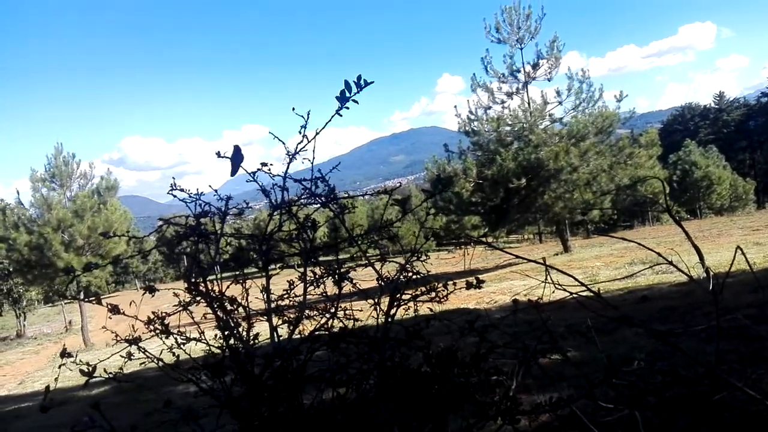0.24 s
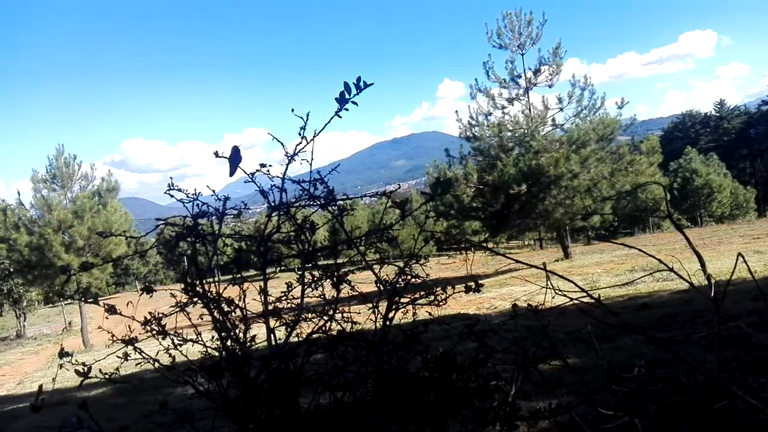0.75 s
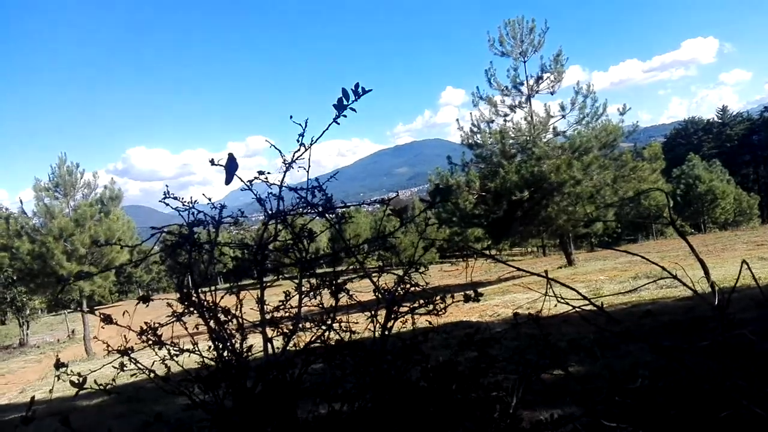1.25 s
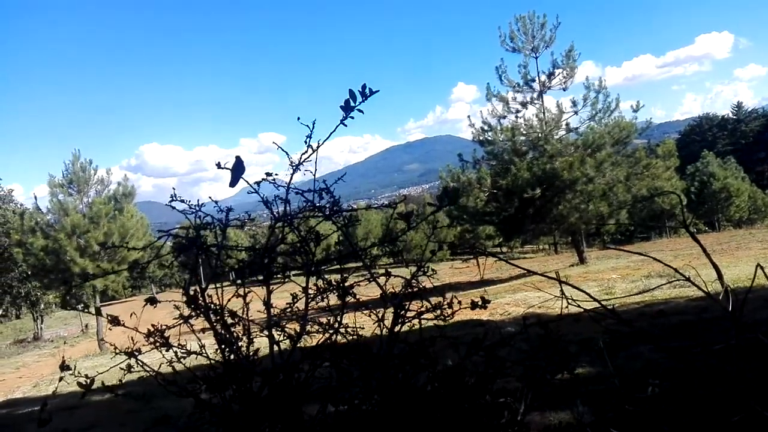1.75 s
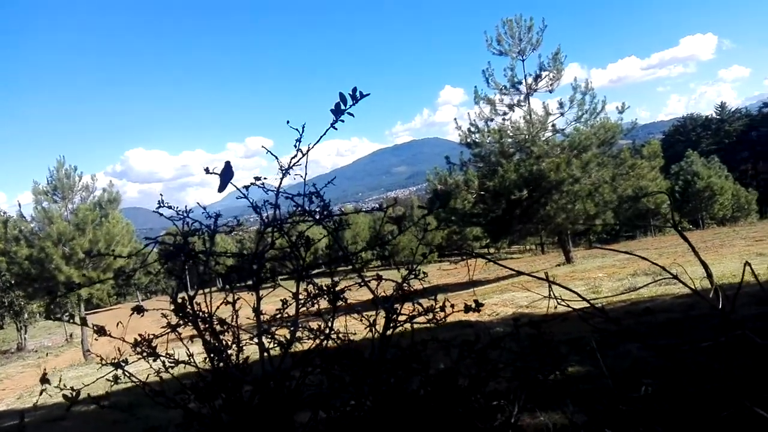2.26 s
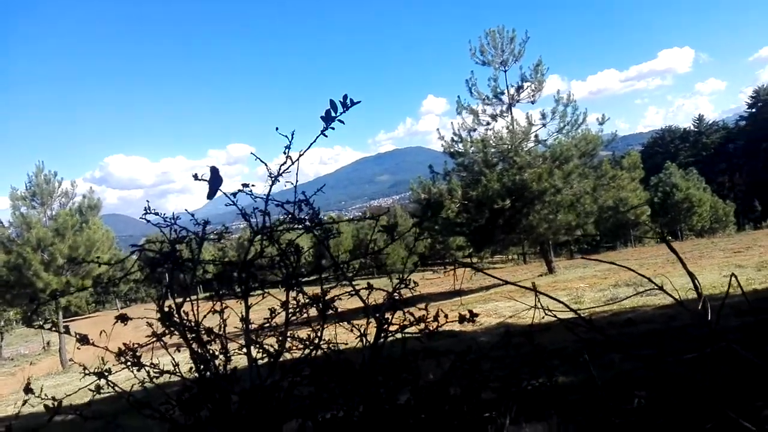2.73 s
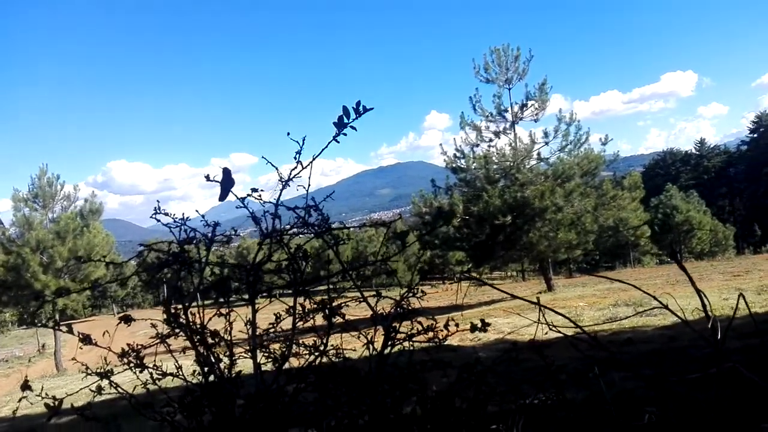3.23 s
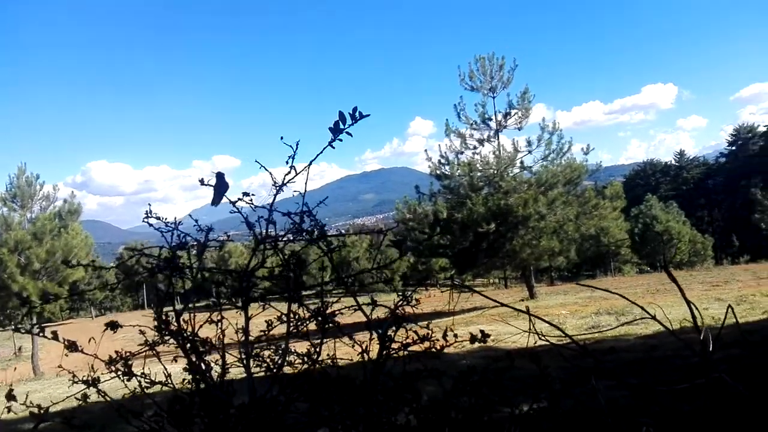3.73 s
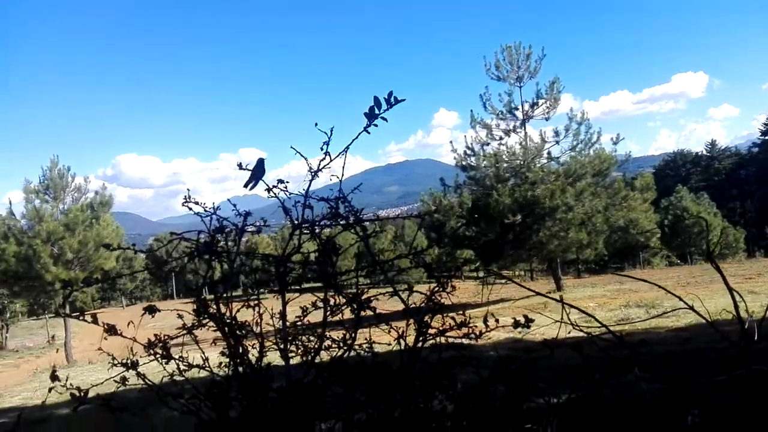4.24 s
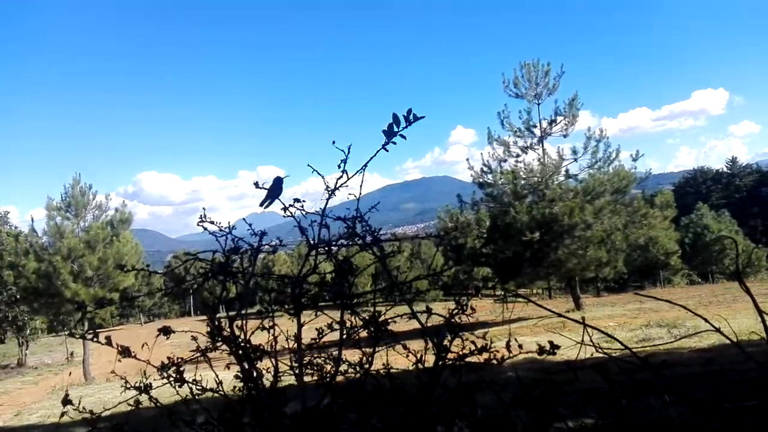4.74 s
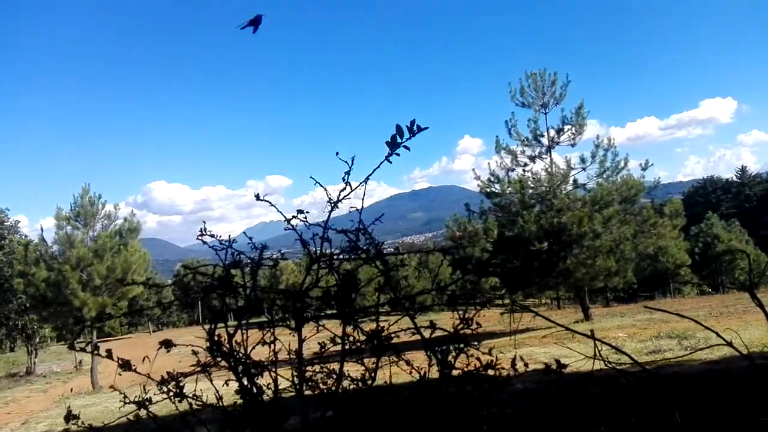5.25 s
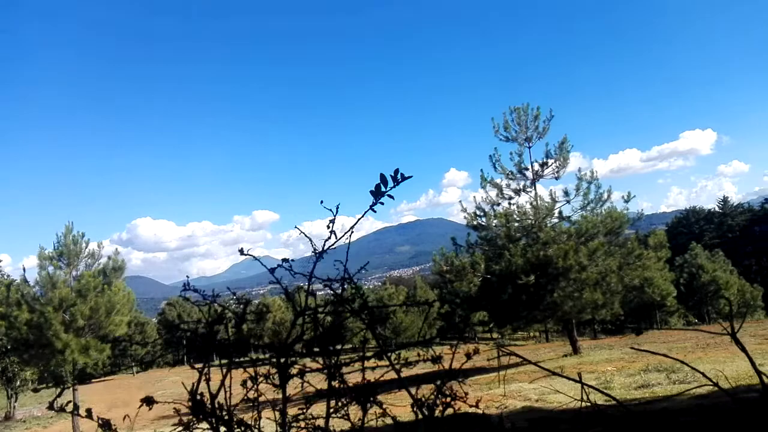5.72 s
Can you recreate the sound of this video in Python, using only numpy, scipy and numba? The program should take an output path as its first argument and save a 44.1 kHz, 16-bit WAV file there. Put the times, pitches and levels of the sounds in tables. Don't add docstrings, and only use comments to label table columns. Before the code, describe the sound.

Eight quick pairs of steep, squeaky bird chips cut through a low unsteady wind hum. The bird is fairly near, with only a slight scattered echo from shrubs. Soft hiss of open air lies behind, with faint distant knocks. Wind rumble and thumps on the phone microphone strengthen in the second half, joined by sleeve rustles and tiny handling ticks, after the bird falls silent.

```python
import sys
import numpy as np
from scipy import signal
from scipy.fft import rfft, irfft
from scipy.io import wavfile
from scipy.ndimage import uniform_filter1d
from numba import njit

SR = 44100
rng = np.random.default_rng(int(sys.argv[2]) if len(sys.argv) > 2 else 0)


def dump(signal):
    limited = np.clip(np.atleast_2d(signal).T, -1, 1)
    pcm = np.round(limited * 32767).astype(np.int16)
    wavfile.write(sys.argv[1], SR, pcm)


def boost_factor(decibels):
    exponent = np.asarray(decibels, float) / 20
    return 10 ** exponent


N = 263718
TIME = np.arange(N) / SR
LEAD_MS = 5


def level(x, db):
    return x * boost_factor(db) / np.sqrt(np.mean(x ** 2))


def shaped(spectrum, size=N):
    point_hz, point_db = np.transpose(spectrum)
    bin_hz = np.arange(1, size // 2 + 2) * SR / size
    gain = boost_factor(np.interp(np.log(bin_hz), np.log(point_hz), point_db, left=-99, right=-99))
    return level(irfft(rfft(rng.standard_normal(size)) * gain, size), 0)


def walk(rate_hz):
    hold = int(SR / rate_hz)
    steps = np.repeat(rng.standard_normal(N // hold + 1), hold)
    smooth = uniform_filter1d(uniform_filter1d(steps, hold), hold)
    return level(smooth[:N], 0)


def add(out, start_s, sound):
    i = int(start_s * SR)
    out[i:i + len(sound)] += sound[:N - i]


def bell(centre_s, width_ms):
    return np.exp(-((TIME - centre_s) * 1000 / width_ms) ** 2)


def steadied(noise, window_s, share):
    loudness = uniform_filter1d(np.abs(noise), int(window_s * SR))
    return noise / (loudness + 0.1 * noise.std()) ** share


@njit
def moving_bandpass(x, hz, q):
    y, band, low = np.empty(len(x)), 0., 0.
    for i in range(len(x)):
        g = np.tan(np.pi * hz[i] / SR)
        v = (band + g * (x[i] - low)) / (1 + g * (g + 1 / q))
        band = 2 * v - band
        low = low + 2 * g * v
        y[i] = v / q
    return y


def vortex_hum(strength_db, hz):
    hum = steadied(moving_bandpass(rng.standard_normal(N), hz, 3.3), 0.016, 0.78)
    hum = boost_factor(strength_db) * moving_bandpass(moving_bandpass(hum, hz, 1.55), hz, 1.7)
    for _ in range(2):
        hum = uniform_filter1d(hum, int(0.0012 * SR))
    return level(hum, -31)


def wind_rumble(rumble_db):
    noise = shaped([(5, -12.5), (15, -1), (28, 0), (40, 6), (55, -11.5), (80, -23.5)])
    return boost_factor(rumble_db) * level(steadied(noise, .06, .25), 0)


def gust_flutter(strength_db, hz, lull_db):
    # columns centre_s, peak_db, rise_and_fall_ms
    gusts = [(.2, -59, 40), (.385, -52, 20), (.62, -64, 60), (1.43, -50, 20), (1.66, -41, 20),
             (2.0, -56, 80), (2.2, -48, 70), (2.41, -36, 25), (2.5, -40, 30), (2.66, -45, 25),
             (2.76, -36, 20), (2.88, -39, 20), (3.05, -53, 60), (3.15, -46, 20), (3.27, -49, 30),
             (3.445, -35, 28), (3.63, -54, 40), (3.79, -44, 35), (3.9, -38, 40), (4.06, -33, 35),
             (4.3, -33, 25), (4.56, -41, 70), (4.9, -43, 80), (5.27, -39, 70), (5.38, -33, 25),
             (5.48, -36, 20), (5.66, -29, 40), (5.83, -42, 25), (5.96, -38, 25)]
    gain = boost_factor(-62 + 1.0 * (strength_db + 33) + .5 * lull_db)
    for centre_s, db, ms in gusts:
        gain = gain + boost_factor(db) * np.exp(-np.abs(TIME - centre_s) * 1000 / ms)
    noise = shaped([(90, -15.5), (130, 3.5), (200, -6.0), (300, -18.5), (450, -33.0), (700, -54), (1000, -72.0)])
    flutter = boost_factor(1.5 * walk(35)) * steadied(noise, .04, .25)
    bright = moving_bandpass(flutter, np.full(N, 330.), .8)
    brightness_db = .25 * (hz - 80)
    flutter = flutter + (boost_factor(brightness_db) - 1) * bright
    return gain * level(flutter, 0.18)


def wind():
    # columns time_s, strength_db, hum_pitch_hz, turbulence_db
    wind_course = [(0.0, -39.5, 48.5, -42), (0.38, -39.5, 49, -46), (0.6, -42, 48.6, -54),
                   (0.93, -39, 53.6, -41), (1.13, -30, 67, -43), (1.45, -33.5, 65.4, -42),
                   (1.68, -31.5, 59.3, -38), (1.85, -32, 62, -47), (2.23, -29.5, 72.5, -40),
                   (2.6, -31.5, 68.2, -39), (3.06, -38, 66.4, -41), (3.44, -38, 65, -33),
                   (3.62, -41, 65, -41), (4.06, -33.5, 76.7, -33), (4.4, -29, 78.8, -32),
                   (4.65, -25.5, 89.3, -34), (5.0, -23, 86, -33), (5.98, -30, 87, -35)]
    # columns centre_s, depth_db, width_ms
    lulls = [(0.042, -11, 17), (0.32, -11.5, 31), (1.001, -11, 30), (1.369, -4.5, 30), (1.548, -21, 30),
             (1.631, -12.5, 17), (2.321, -9, 46), (2.701, -8, 30), (2.851, -11.5, 50), (3.2, -18.5, 38),
             (3.349, -7.5, 23), (3.56, -6.5, 59), (3.72, -6, 46), (3.98, -3.5, 37), (4.36, -7.5, 19),
             (5.011, -14.5, 35), (5.38, -8, 25), (5.1, -5, 30), (5.539, -10, 21), (5.82, -6, 30),
             (5.985, -30, 22)]
    time_s, *columns = np.transpose(wind_course)
    strength_db, hz, turbulence_db = [np.interp(TIME, time_s, column) for column in columns]
    lull_db = sum(db * bell(centre_s, ms) for centre_s, db, ms in lulls)
    rumble_db = turbulence_db + .4 * lull_db + 3 * walk(9.8)
    hum = vortex_hum(strength_db + lull_db, hz)
    return hum + wind_rumble(rumble_db) + gust_flutter(strength_db, hz, lull_db)


def hillside_air():
    # columns pitch_hz, level_db (per Hz)
    air_colour = [(180, -37), (300, -1), (450, -8.5), (870, -5), (1750, -11), (3300, -13.5), (4300, -13.5),
                  (12500, -17.5), (14400, -19.5)]
    return boost_factor(-75 + 0.98 * walk(3)) * shaped(air_colour)


def push(peak_db, edge_db):
    ms = np.arange(-20, 20, 1000 / SR)
    hz = np.full(len(ms), 520.)
    sign = np.sign(rng.standard_normal())
    ragged = rng.standard_normal(len(ms))
    for q in (0.99, 1.1, 1.1):
        ragged = moving_bandpass(ragged, hz, q)
    edge = level(ragged, edge_db - 16.0)
    pressure = np.hanning(len(ms)) / (1 + (ms / 1.394) ** 2) + edge * np.exp(-(ms / 6.5) ** 2)
    return sign * boost_factor(peak_db + 11) * pressure


def thumps():
    # columns time_s, peak_db, share_above_500_hz_db
    wind_blows = [(0.197, -66, -15), (0.385, -62, -30), (1.657, -46.5, -22), (2.149, -47, -36),
                  (2.417, -42, -45), (2.499, -37, -25), (2.654, -58, -28), (2.753, -39.5, -35),
                  (3.157, -47.5, -28), (3.968, -50, -35), (3.447, -37, -40), (3.782, -39, -30),
                  (3.895, -29.5, -40), (4.057, -35, -29), (4.078, -29, -32), (4.122, -30, -15),
                  (4.146, -32.5, -19), (4.215, -40, -40), (4.27, -29, -30), (4.3, -35, -27),
                  (4.566, -42, -30), (5.371, -26, -32), (5.499, -40, -42), (5.637, -26.5, -39),
                  (5.667, -27, -30.5), (5.715, -35, -29), (5.82, -43, -35), (5.942, -38, -42)]
    # time_s, depth_db, width_ms
    last_gust = (5.981, -20, 3.5)
    out = np.zeros(N)
    for time_s, db, edge_db in wind_blows:
        add(out, time_s - .016, push(db, edge_db))
    end_s, depth_db, width_ms = last_gust
    return out - boost_factor(depth_db) * bell(end_s, width_ms)


def chip(hold_ms, length_ms, fade_db, flick_db, slack, waver):
    # columns pitch_hz, level_db
    throat = [(3400, -5), (4000, -8), (4600, -2.5), (5300, 3), (6500, 2), (8000, -7), (10200, -7),
              (12000, -22), (14000, -22)]
    ms = np.arange(len(waver)) / SR * 1000 - LEAD_MS
    after_ms, before_ms = np.maximum(ms, 0), np.minimum(ms, 0)
    sag = (4300 - 32 * ms) * (1 + .005 * slack) + 1700 * np.exp(-after_ms / 3.0)
    snap = (4900 - 60 * ms) / (1 + np.exp((ms - 1.2) / 0.29))
    flick = 1 / (1 + np.exp((length_ms - ms) / .3))
    hz = sag + snap + 1050 * flick
    phase = 2 * np.pi * np.cumsum(hz * (1 + 0.006 * waver)) / SR

    breath = np.clip((ms + hold_ms) / .5, 0, 1) * boost_factor(-fade_db * after_ms + 2.4 * before_ms) * (1 - flick)
    for late_ms, gain in (1.6, 1), (4.2, .8 * (fade_db > .45)):
        breath = breath + gain * boost_factor(flick_db) * np.exp(-((ms - length_ms - late_ms) / 0.42) ** 2)

    throat_hz, throat_db = np.transpose(throat)
    overtone_db = [0, -4.5 + 2.1 * slack + 2.2 * waver, -.5 - 2.0 * waver]
    sound = 0
    for k, db in enumerate(overtone_db, 1):
        passed_db = np.interp(np.log(k * hz), np.log(throat_hz), throat_db, right=-90)
        sound = sound + boost_factor(db + passed_db - 0.17 * (k - 1) * ms) * np.sin(k * phase)
    hiss = np.diff(rng.standard_normal(len(ms) + 2), 2)
    sound = (sound + boost_factor(-45.5) * hiss * (ms > 1)) * breath
    return sound / np.abs(sound).max()


def shrubs():
    # columns delay_ms, level_db
    twigs = [
        (2.6, -20),
        (4.7, -21.5),
        (7.9, -27.5),
        (11.5, -30),
    ]
    t = np.arange(int(.2 * SR)) / SR
    patches_db = np.repeat(3.0 * rng.standard_normal(len(t) // 60), 60)
    leaves = level(rng.standard_normal(len(t)) * boost_factor(patches_db), 0)
    dying = boost_factor(-51.0 - 60 * t / 0.037) + boost_factor(-53.5 - 60 * t / 0.2)
    leaves = leaves * np.clip(t / 0.0018, 0, 1) * dying
    echoes = leaves + 0.67 * np.diff(leaves, prepend=0)
    for (ms, db), (later, louder) in zip(twigs, rng.standard_normal((len(twigs), 2))):
        gain = boost_factor(db + 2.6 * np.clip(louder, -1.5, 1))
        add(echoes, ms * (1 + 0.068 * later) / 1000, gain * np.ones(1))
    echoes[0] = 1
    return echoes


def hummingbird():
    # columns start_s, peak_db, hold_at_top_pitch_ms, length_ms, closing_flick_db
    chips = [(0.245, -24.5, .26, 16.7, -14), (.3406, -24.5, .25, 15.6, -18), (0.8256, -25, .8, 16.4, -41),
             (0.9257, -23.5, .6, 14, -13), (1.1654, -24.5, .23, 17, -22), (1.266, -23, 3.8, 15, -13.5),
             (1.5474, -23, 2.1, 17.5, -16), (1.6442, -22.5, .41, 15.7, -15), (1.8909, -24.5, .19, 16.4, -4),
             (1.9868, -24.5, .1, 13, -16), (2.384, -24.5, .3, 19, -19.5), (2.4887, -26, 1, 14.7, -23),
             (2.8833, -26.5, .2, 16.7, -23), (2.9803, -24, 1.2, 14, -15), (3.7, -25, .48, 16.2, -31),
             (3.8024, -25.5, .12, 17, -27)]
    pair_fades = (0.43, 0.97)
    out, size = np.zeros(N), int(.035 * SR)
    for k, (start_s, db, hold_ms, length_ms, flick_db) in enumerate(chips):
        waver = rng.standard_normal(size)
        waver = level(uniform_filter1d(uniform_filter1d(waver, 60), 60), 0)
        slack = rng.standard_normal()
        sound = boost_factor(db - 0.5) * chip(hold_ms, length_ms, pair_fades[k % 2], flick_db, slack, waver)
        add(out, start_s - .0004 - LEAD_MS / 1000, signal.fftconvolve(sound, shrubs()))
    return out


def rough_bumps():
    # columns time_s, peak_db
    bump_rows = [(0.821, -55), (0.927, -50), (1.164, -50), (1.263, -47.5), (1.627, -50), (1.884, -48.5),
                 (2.283, -58), (2.385, -52), (2.866, -44), (3.256, -58), (3.715, -50), (3.807, -44),
                 (4.016, -50), (4.79, -48), (4.927, -47)]
    out = np.zeros(N)
    for time_s, db in bump_rows:
        add(out, time_s - .016, push(db, -10))
    return out


def sleeve_rubs():
    # columns time_s, level_db
    strokes = [
        [(1.88, -90), (1.92, -77), (2.0, -74), (2.06, -77), (2.1, -90)],
        [(3.68, -84), (3.74, -74), (3.83, -66.5), (3.93, -67.5), (4.0, -70.5), (4.13, -69), (4.17, -75),
         (4.25, -77), (4.29, -92)],
        [(4.45, -90), (4.56, -72.5), (4.76, -67.5), (4.854, -64), (4.9, -65.5), (5.01, -69), (5.06, -80),
         (5.17, -89)],
    ]
    # columns pitch_hz, level_db (per Hz)
    cloth = [(800, -13.5), (1400, -5), (2400, -8.5), (3300, -5), (5000, 1), (6800, 5), (9000, 3.5),
             (11600, -3.5), (14400, -19)]
    pressure = 0
    for stroke in strokes:
        pressure = pressure + boost_factor(np.interp(TIME, *np.transpose(stroke), left=-140, right=-140))
    cloth_hz, cloth_db = np.transpose(cloth)
    out, flutter = 0, walk(70)
    for hz in 900 * 2 ** np.arange(0, 4.1, .5):
        band_db = np.interp(np.log(hz), np.log(cloth_hz), cloth_db) + 10 * np.log10(hz / 6000)
        band_db += 2.5 if hz < 4000 else -3.5
        patches_db = 2.0 * walk(14) + .9 * flutter
        fibres = shaped([(hz / 2, -30), (hz / 1.4, -6), (hz, 0), (hz * 1.4, -6), (hz * 2, -30)])
        out = out + pressure * boost_factor(band_db + patches_db) * fibres
    weave = shaped([(5600, -29.5), (6300, -2.0), (6800, 1.5), (7400, -5), (8200, -32.5)])
    return out + pressure * boost_factor(-6.5) * weave


def seam_ticks():
    # columns start_s, peak_db, centre_hz
    ticks = [(1.89, -57, 1390), (1.936, -59, 1100), (1.981, -48, 1210), (2.006, -50.5, 830),
             (2.866, -62, 1300), (3.04, -59, 2100), (4.031, -53, 1300), (4.06, -53, 1590), (4.1, -62, 1310),
             (4.052, -52, 800), (4.084, -54, 1690), (4.138, -58.5, 1090), (4.379, -61.5, 3500),
             (4.662, -52, 846), (4.68, -58.5, 2000), (4.7, -65, 1110), (4.729, -53.5, 2700),
             (4.855, -49.5, 2390), (4.918, -51.5, 1888)]
    out, t = np.zeros(N), np.arange(int(.015 * SR)) / SR
    for start_s, db, hz in ticks:
        blow = rng.standard_normal(len(t)) * np.exp(-t / 0.0025)
        centre_hz = np.full(len(t), 1. * hz)
        ring = moving_bandpass(moving_bandpass(blow, centre_hz, 1.5), centre_hz, 0.15)
        add(out, start_s, boost_factor(db + 3.0) * ring / np.abs(ring).max())
    return out


def far_knocks():
    # columns peak_s, peak_db, rise_ms, decay_to_minus_60_db_s
    knocks = [
        (1.89, -68, 3, 0.18),
        (2.012, -62, 56, 0.14),
        (2.847, -52, 3, .5),
        (2.95, -73.5, 54, 2.5),
        (4.06, -71.5, 59, 1),
        (4.124, -72, 8, 0),
        (4.662, -66, 3.6, 0.4),
    ]
    # columns pitch_hz, level_db (per Hz)
    knock_colour = [(300, -11), (500, -1.5), (750, 2.5), (1050, 4), (1400, -5), (1900, -9), (2500, -33),
                    (3500, -31.5)]
    gain = 0
    for peak_s, db, rise_ms, decay_s in knocks:
        dying_db = 60 * (TIME - peak_s) / decay_s
        rising_db = 10 * (peak_s - TIME) * 1000 / rise_ms
        gain = gain + boost_factor(db - np.maximum(dying_db, rising_db))
    return gain * level(boost_factor(1.6 * walk(120)) * shaped(knock_colour), 0.28)


def far_tones():
    # columns start_s, end_s, pitch_hz, level_db
    tones = [
        (2.097, 2.95, 511, -78.5),
        (4.95, 5.441, 883, -85),
    ]
    out = np.zeros(N)
    for start_s, end_s, hz, db in tones:
        fade = np.clip(np.minimum(TIME - start_s, end_s - TIME) / 0.072, 0, 1)
        phase = 2 * np.pi * np.cumsum(hz + 6 * walk(2.0)) / SR
        out = out + fade * boost_factor(db + 2.9 * walk(27)) * np.sin(phase)
    return out


def scene():
    around_phone = wind() + thumps() + rough_bumps() + sleeve_rubs() + seam_ticks()
    hillside = hillside_air() + hummingbird() + far_knocks() + far_tones()
    return (around_phone + hillside)[None]


def band_limit(x):
    return signal.sosfilt(signal.butter(12, 14440, fs=SR, output="sos"), x)


def record(dry):
    top_cut = signal.ellip(8, .1, 50, 14500, fs=SR, output="sos")
    mix = signal.sosfiltfilt(top_cut, dry)
    return band_limit(mix)


dry = scene()
out = record(dry)
dump(out)
```